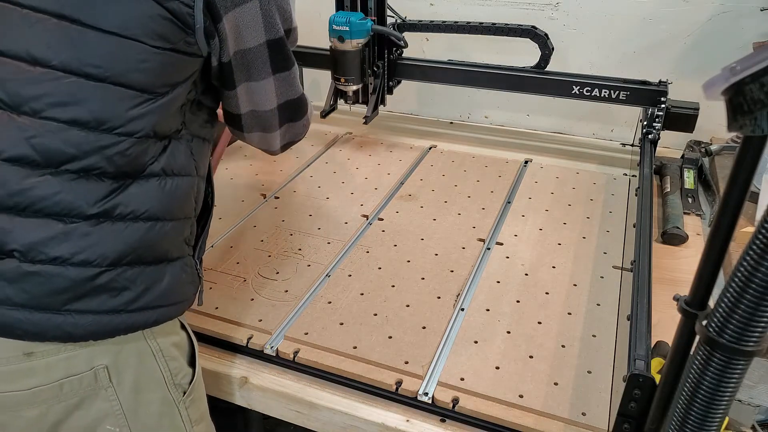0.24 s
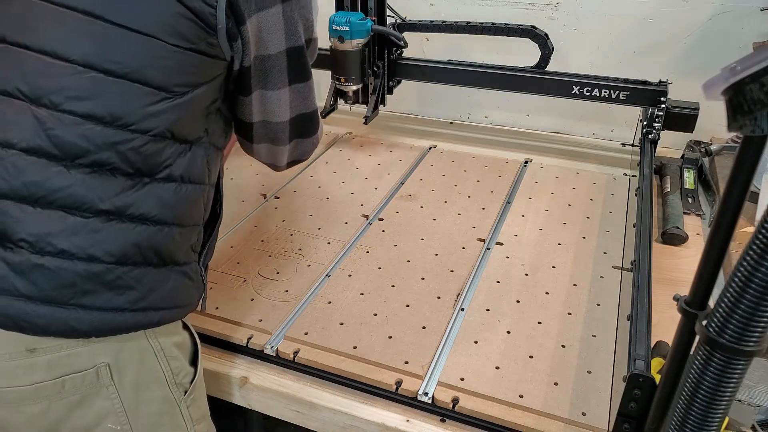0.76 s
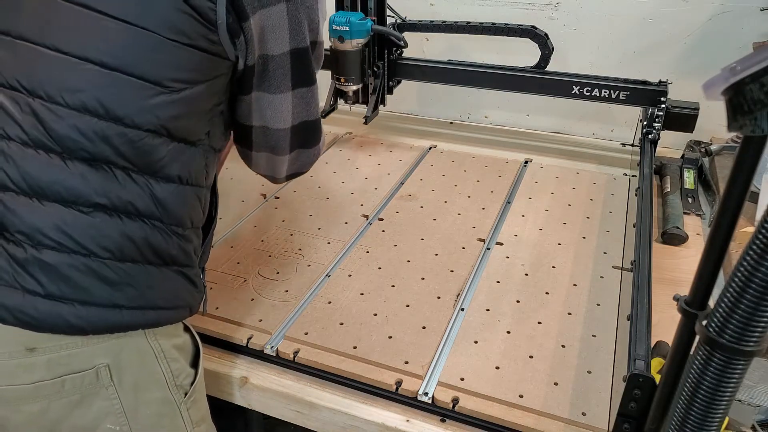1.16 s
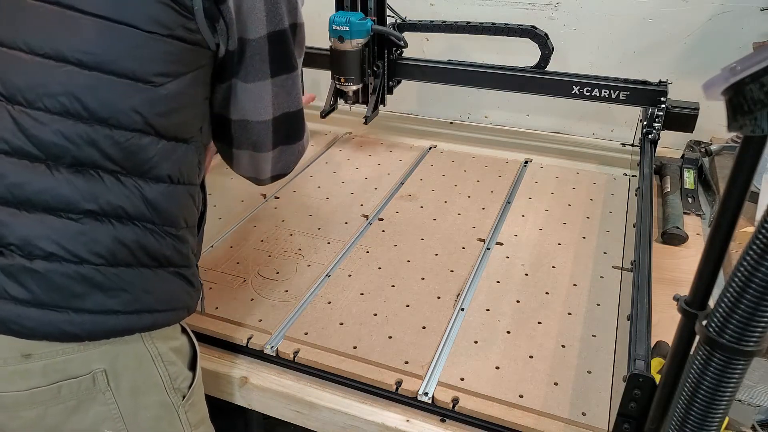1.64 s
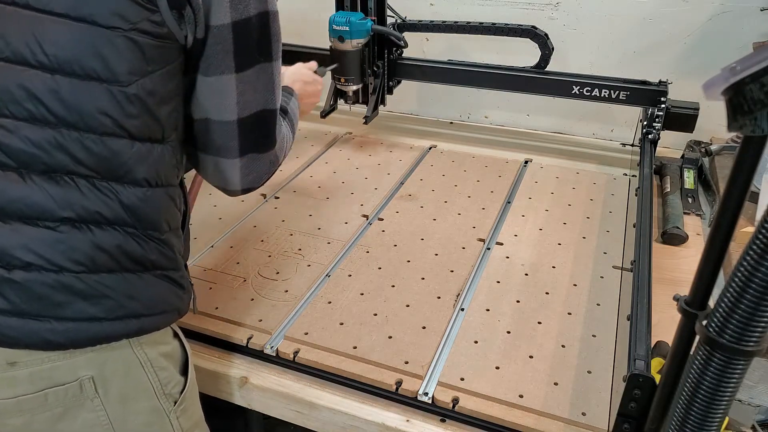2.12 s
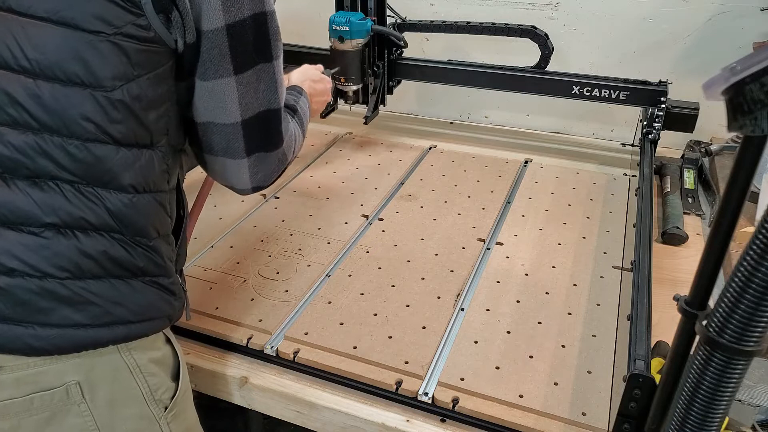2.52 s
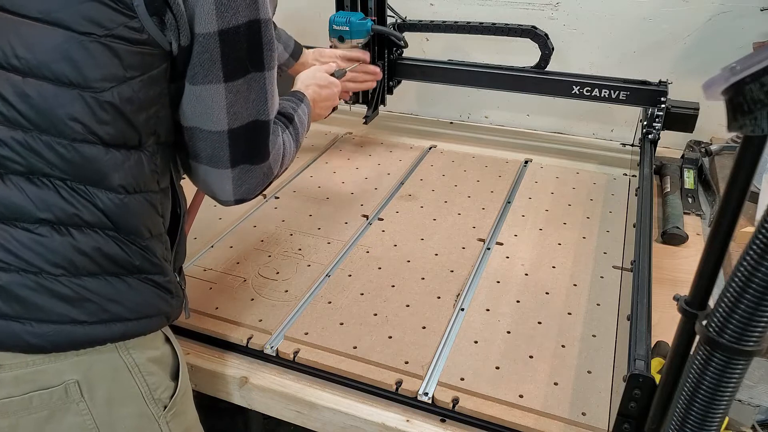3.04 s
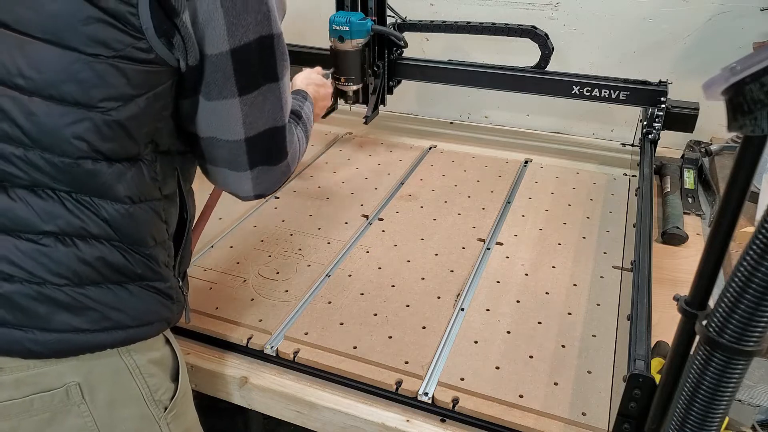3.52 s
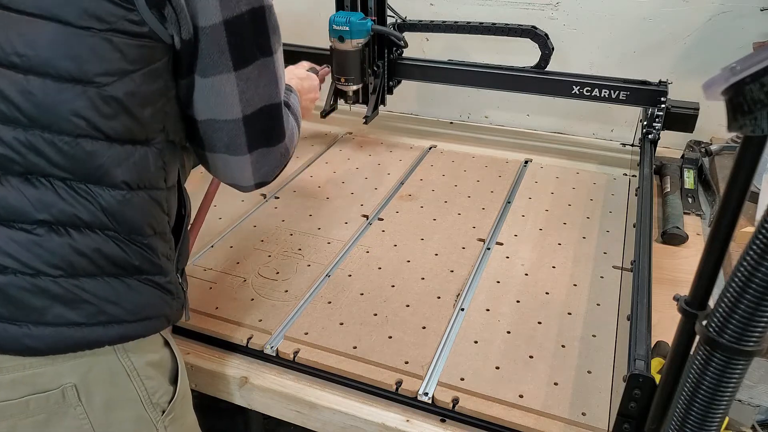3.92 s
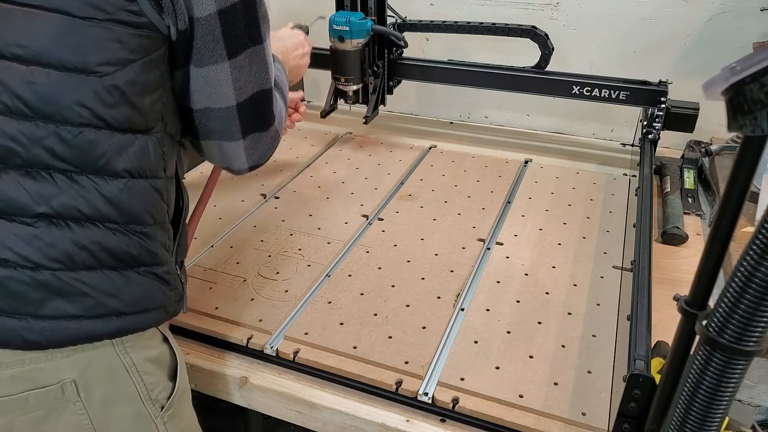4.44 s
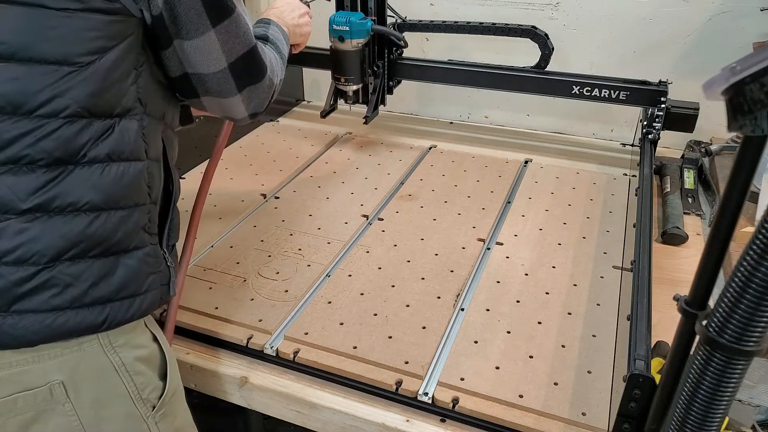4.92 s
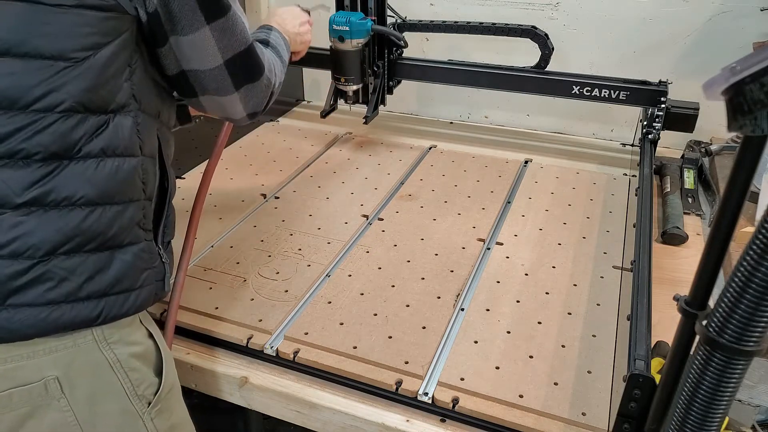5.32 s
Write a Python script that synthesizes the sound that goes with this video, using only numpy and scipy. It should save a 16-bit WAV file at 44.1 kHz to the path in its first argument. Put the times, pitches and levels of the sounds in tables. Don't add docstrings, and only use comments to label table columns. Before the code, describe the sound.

A compressed-air gun is already blowing at the start, a bright, loud hiss with hollow, pipe-like colour, wavering as it sweeps over a machine until about 1.0 s. Over it, at 0.25-0.37 s, a part knocks on the bed: a quick scrape, several sharp cracks on board, a small metallic ring and low bench thuds, somewhat left. Short bursts of about a tenth of a second follow at 1.25, 1.45, 1.65, 1.9, 2.25 and 2.45 s, several ending in a tiny valve spit, strongest near 2.4 s. From 2.7 to 3.4 s the air rests: nylon vest rustles, soft low bench thuds, a faint fitting tinkle near 3.3 s. More bursts come at 3.45, 3.65 and 4.15 s, then cloth rustle around 4.5 s. A longer blast runs 4.75-5.45 s, easing away into soft thuds and padding puffs. Small quiet workshop, close stereo camera microphone, short echoes.

```python
import sys
import numpy as np
from scipy import signal
from scipy.fft import rfft, irfft, next_fast_len
from scipy.io import wavfile
from scipy.ndimage import uniform_filter1d

SR = 44100
rng = np.random.default_rng(int(sys.argv[2]) if len(sys.argv) > 2 else 0)


def voltage_ratio(decibels):
    exponent = np.asarray(decibels, float) / 20
    return 10 ** exponent


def int16_out(signal):
    q = np.round(np.clip(np.atleast_2d(signal).T, -1, 1) * 32767)
    wavfile.write(sys.argv[1], SR, q.astype(np.int16))


N = 245637
T = np.arange(N) / SR


def scale_to(x, db):
    return x * voltage_ratio(db) / np.sqrt(np.mean(x ** 2))


def colour(points, hz):
    at, value = np.transpose(points)
    return np.interp(np.log(hz + 1), np.log(at + 1), value)


def shape(x, points):
    size = next_fast_len(x.shape[-1] + 4096)
    gain = voltage_ratio(colour(points, np.fft.rfftfreq(size, 1 / SR)))
    return irfft(rfft(x, size) * gain, size)[..., :x.shape[-1]]


def bump(hz, centre_hz, width_hz):
    return 1 / (1 + (2 * (hz - centre_hz) / width_hz) ** 2)


def walk(rate, size):
    hold = int(SR / rate)
    steps_held = np.repeat(rng.standard_normal(size // hold + 1), hold)
    return 1.3 * uniform_filter1d(uniform_filter1d(steps_held, hold), hold)[:size]


def ring(hz, t60):
    t = np.arange(int(1.2 * t60 * SR) + 8) / SR
    return np.sin(2 * np.pi * hz * t) * np.exp(-np.log(1000) * t / t60)


def add(out, s, sound):
    start = int(s * SR)
    sound, start = sound[..., max(-start, 0):], max(start, 0)
    out[..., start:start + sound.shape[-1]] += sound[..., :out.shape[-1] - start]


def heard(x, late, wet_db, t60, alike_hz, moving, room_late=12):
    hop, lead, t = 800, 30, np.arange(4400) / SR
    high = signal.butter(2, alike_hz, "high", fs=SR)
    low = signal.butter(2, alike_hz, fs=SR)
    keep = np.sqrt(1 - np.clip(moving, 0, 1) ** 2)
    decay = np.exp(-np.log(1000) * t / t60) * (t > .002)
    decay = decay * voltage_ratio(wet_db) / np.sqrt(np.sum(decay ** 2))
    out = np.zeros((2, len(x) + 3 * hop + len(t)))
    paths = rng.standard_normal((3, len(t)))
    padded = np.pad(x, (hop, 2 * hop))
    window = signal.windows.hann(2 * hop, sym=False)
    for start in range(0, len(x) + hop, hop):
        paths = keep * paths + np.sqrt(1 - keep ** 2) * rng.standard_normal(paths.shape)
        bass = signal.lfilter(*low, [np.roll(paths[0], room_late), paths[0]])
        room = (signal.lfilter(*high, paths[1:]) + bass) * decay
        room[[0, 1], [lead + late, lead]] += 1
        piece = signal.fftconvolve((padded[start:start + 2 * hop] * window)[None], room, axes=1)
        out[:, start:start + piece.shape[1]] += piece
    return out[:, hop + lead:] / np.sqrt(1 + voltage_ratio(2 * wet_db))


def hiss(table, centres, edges, gain_db, swell_db, flicker_db, rate):
    s, db, *over = np.transpose(table)[:len(centres) + 1]
    size = next_fast_len(int((s[-1] - s[0]) * SR))
    t, hz = s[0] + np.arange(size) / SR, np.fft.rfftfreq(size, 1 / SR)
    noise = rfft(rng.standard_normal(size)) * voltage_ratio(gain_db(hz))
    power = voltage_ratio(2 * gain_db(hz))
    norm = [10 * np.log10(power[(hz > lo) & (hz < hi)].sum() / len(hz)) for lo, hi in edges]
    track = np.array([np.interp(t, s, db + o) - n for o, n in zip([0] + over, norm)])
    cut = np.concatenate([np.geomspace(130, 2600, 11), np.arange(3200, 17000, 1130)])
    out, shared = 0, walk(rate, size)
    swell = walk(rate / 4, size)
    for lo, mid, hi in zip(cut, cut[1:], cut[2:]):
        weights = [np.interp(-np.log(mid), -np.log(centres), row) for row in np.eye(len(centres))]
        shared = .7 * shared + .7 * walk(rate, size)
        band = irfft(noise * np.interp(hz, [lo, mid, hi], [0, 1, 0]), size)
        out = out + band * voltage_ratio(weights @ track + swell_db * swell + flicker_db * shared)
    fade = np.clip(np.minimum(t - s[0] + (s[0] == 0), s[-1] - t) / .006, 0, 1)
    return out * fade * voltage_ratio(2.0)


def panned(pair, table):
    s, pan_db = np.transpose(table)[[0, -1]]
    pan_db = np.interp(s[0] + np.arange(pair.shape[1]) / SR, s, pan_db)
    return pair * voltage_ratio(np.array([pan_db, -pan_db]) / 2)


# (frequency [Hz], left minus right [dB])
PORT_DIFFERENCE = [(60, -2), (110, -3), (200, 0.5), (380, 6.5), (700, 6.5), (1290, 6), (2380, 9),
                   (4400, 12), (8120, 10.5), (15000, 5)]


def ports(pair):
    tilt = np.array(PORT_DIFFERENCE) - [0, 4.5]
    return np.array([shape(pair[0], tilt * [1, .5]), shape(pair[1], tilt * [1, -.5])])


def steps(start, end):
    return start + np.arange(0, np.ceil((end - start) * 4) / 4, .004)


# (share of the opening time [0-1], level under full flow [dB])
VALVE_OPENING = [(-.3, 89.5), (0, 47.5), (.12, 34.5), (.5, 14.5), (.85, 2.5), (1, 0)]


def flow(s, opens, lets_go, open_db, end_db, ease, open_s):
    full = np.interp(s, [opens + open_s, lets_go], [open_db, end_db])
    opening = np.interp((s - opens) / open_s, *np.transpose(VALVE_OPENING))
    after = np.maximum(s - lets_go, 0)
    shut = np.maximum(after - ease, 0)
    closing = 126 * np.minimum(after, ease) + 321.5 * shut + 501.5 * shut ** 2
    return full, opening, closing


# (time [s], distance gain [dB], extra metal roar [dB], extra hollow roar [dB])
BLAST_SWEEP = [(.0, 0.5, -3, 5.5), (.08, -1, 0.5, 0), (.25, 1, -5.5, 6.5), (.47, 3, -7.5, -3.5),
               (.75, 1.5, -7, -1.5), (.95, -0.5, -1.5, 2.5), (4.779, -1, -0.5, -6.5), (4.82, 0, 8, -2.5),
               (4.91, 0.5, 8.5, 0.5), (4.995, 1.5, 1, -9), (5.073, 1.2, 6, -0.5), (5.217, 0, 2.5, -8.5),
               (5.323, 2, -0.5, 6), (5.427, 4, 0.5, -13)]


def pull(row, aim):
    opens, lets_go, open_s = row[0], row[1], row[5]
    s = steps(opens, lets_go + .24)
    full, opening, closing = flow(s, *row)
    at, *sweep = np.transpose(BLAST_SWEEP)
    is_long = lets_go - opens > .5
    gain_db, metal_db, hollow_db = [np.interp(s, at, column) * is_long for column in sweep]
    surge = 2 * (np.exp(-np.maximum(s - opens - open_s, 0) / .06) - .5)
    # dB that body, metal and hollow roar gain per dB under full flow
    opening_dull, closing_dull = (0.39, 0.39, .05), (0.29, 0.31, 0.29)
    over = [base + extra - surge + a * opening + b * closing
            for base, extra, a, b in zip(aim, (0, metal_db, hollow_db), opening_dull, closing_dull)]
    lean_db = np.minimum(.08 * (opening + closing), 6) - .5
    return np.transpose([s, full + gain_db + surge / 2 - opening - closing, *over, lean_db])


def tire(jet, row, db_per_s):
    top = shape(jet, [(9000, -40), (11000, -6), (13500, 0)])
    s = row[0] + np.arange(len(jet)) / SR
    fade_db = db_per_s * ((row[0] + row[1]) / 2 + row[4] - s)
    return jet + top * (voltage_ratio(np.clip(fade_db, -9, 9)) - 1)


# (frequency [Hz], level per Hz [dB])
JET_COLOUR = [(88, -65.5), (150, -32.5), (446, -22), (1030, -21.5), (1460, -16.5), (2120, -17), (6290, -7),
              (7950, -7), (11100, -3), (15700, -4.5)]
TUBE_HZ = [624, 1560, 2607, 3744, 5056, 6264, 7900, 9080, 10280, 11420, 12450, 13520, 14600, 15620]
# (width [Hz], level over the jet [dB])
TUBE_MODES = [(330, 2.5), (370, 6.5), (870, 7), (540, 6.5), (670, 4.5), (720, 5), (300, 2), (300, 4),
              (350, 4.5), (300, 7), (350, 7), (350, 7), (350, 8.5), (280, 5.5)]


def nozzle_colour(hz, edge, bright_db):
    edge_hz, edge_db, *middle_db = edge
    tube = sum(db * bump(hz, f, width) for f, (width, db) in zip(TUBE_HZ, TUBE_MODES))
    tube = tube + edge_db * bump(hz, edge_hz, 500)
    tube = tube + sum(db * bump(hz, f, f / 4) for f, db in zip((2700, 5800, 7800), middle_db))
    return colour(JET_COLOUR, hz) + tube + bright_db * np.log2(np.maximum(hz / 8e3, 1))


# (opens [s], let go [s], jet once open [dB], jet at let-go [dB], slow easing-off [s])
PULLS = [(-.14, 0.965, -29.5, -32.5, 0.035), (1.256, 1.37, -29.5, -26, 0.0044),
         (1.46, 1.569, -26, -25.5, 0.0041), (1.666, 1.784, -20.5, -24.5, .005),
         (1.902, 2.046, -27, -27.5, 0.0082), (2.25, 2.366, -25.5, -24.5, 0.0034),
         (2.465, 2.573, -26.5, -24.5, 0.0039), (3.464, 3.544, -34.5, -24, .005),
         (3.637, 3.783, -26, -26, 0.086), (4.137, 4.245, -24, -23.5, 0.0038),
         (4.742, 5.418, -25.5, -31, 0.071)]
OPEN_S = [.036, 0.04, 0.036, 0.03, 0.035, 0.034, 0.03, 0.026, 0.033, 0.042, 0.035]
# (body [dB over jet], metal roar [dB over jet], hollow roar [dB over jet],
# brightness above 8 kHz [dB per octave])
AIMS = [(-10, -22, -28, 0), (-11, -26, -34.5, -1), (-9, -24, -29.5, 0.8), (-9, -28, -32.5, -4.5),
        (-11.5, -26.5, -32, -5), (-13, -28, -38, -3), (-11.5, -25, -36.5, -2), (-11.5, -21.5, -36.5, -4),
        (-10.5, -24, -36, -2.7), (-12.5, -21.5, -35.5, 0.5), (-9.5, -21.5, -30.5, -2.5)]
# (edge tone [Hz], its level [dB], near 2.7 kHz [dB], near 6 kHz [dB],
# near 8 kHz [dB])
EDGES = [(12450, -1, -0.1, -0.2, 2.5), (13500, 2.5, -4, 1.8, 1), (14700, 4, -1.7, 1.8, 3),
         (10800, 2.5, -0.3, 0.4, 1.5), (14600, 6.5, 0.3, 1.3, 0), (12400, 1, 3, -2.5, 0.3),
         (11450, 4.5, -1, 0.8, 3.5), (14600, 3, -1.5, 1, 3), (13600, 3, 0, 3, 1.5), (12400, 5.5, 1, -1, -1),
         (12240, 0.5, -1, 1.7, -0.3)]
LEFT_LATE = [24, 14, 12, 20, 10, 4, 4, 6, -4, -8, -5]
ECHO_LATE = [8, 10, 10, 10, 10, 10, 10, 10, 10, 10, -6]
TIRING = [3.5, .1, .1, -1, .1, 2, 2, .1, 34, .1, 7]
CONTROL_HZ = [11500, 4300, 1400, 500]


def gun():
    out = np.zeros((2, N))
    pulls = zip(PULLS, OPEN_S, AIMS, LEFT_LATE, EDGES, ECHO_LATE, TIRING)
    for row, open_s, (*aim, bright_db), late, edge, echo_late, tiring in pulls:
        table = pull((*row, open_s), aim)
        jet = hiss(table, CONTROL_HZ, [(8e3, 16e3), (2400, 7e3), (1e3, 2e3), (200, 900)],
                   lambda hz: nozzle_colour(hz, edge, bright_db),
                   swell_db=-0.27, flicker_db=0.33, rate=25)
        jet = tire(jet, row, tiring)
        pair = heard(jet, late, wet_db=9.0 - 0.3 * bright_db, t60=0.078, alike_hz=1970,
                     moving=0.87, room_late=echo_late)
        add(out, table[0][0], panned(pair, table))
    return ports(out)


# (frequency [Hz], level per Hz [dB])
HUSH_COLOUR = [(18, -38), (30, -6.5), (81, -5.5), (325, -24), (2380, -29), (4960, -25), (7350, -29),
               (15700, -32)]


def hush():
    return scale_to(shape(rng.standard_normal((2, N)), HUSH_COLOUR), -77.5)


# (time [s], peak [dB], frequency [Hz], t60 [s])
SLAMS = [
    (.252, -32, 68.3, 0.055),
    (.274, -25.5, 80, 0.068),
    (.306, -32.5, 90, .07),
    (.340, -29, 68, 0.025),
]
# (time [s], peak [dB], frequency [Hz], t60 [s])
THUDS = [(.385, -47, 62, .06), (0.409, -39, 62, 0.057), (0.431, -44, 52, 0.048), (0.476, -52, 62, 0.041),
         (0.498, -54, 72, .06), (0.544, -52, 53.8, 0.083), (0.597, -56, 87, 0.13), (0.679, -58, 55.7, 0.18),
         (0.797, -58, 72, 0.27), (2.836, -63, 85.3, .06), (2.861, -55, 77.5, 0.12),
         (2.894, -54, 68.3, 0.12), (2.919, -55, 72, 0.12), (2.961, -61, 56, 0.12), (3.014, -50, 67.6, 0.18),
         (3.048, -55, 78.6, 0.14), (3.086, -54, 78, 0.11), (3.113, -45, 75, 0.26),
         (3.204, -60.5, 65, 0.095), (3.239, -56, 73.5, 0.052), (3.265, -57.5, 76.4, 0.034),
         (3.328, -70, 72.7, 0.13), (4.29, -63, 63.7, 0.23), (5.045, -60, 78.1, 0.1),
         (5.083, -54, 64.6, 0.076), (5.134, -59, 61.9, 0.12), (5.425, -57, 100, 0.15),
         (5.461, -51, 121, 0.1), (5.494, -55, 99, 0.12), (5.513, -53, 88.5, 0.055),
         (5.545, -53, 59.2, 0.12)]


def thuds():
    out = np.zeros((2, N))
    for s, db, hz, t60 in [*SLAMS, *THUDS]:
        push = signal.windows.hann(int(1.6 * SR / hz))
        thud = np.convolve(ring(hz, t60), push * ring(hz, 0.9)[:len(push)])
        thud = voltage_ratio(db) * thud / np.abs(thud).max()
        late = .003 if s < 1 else .0003 if s < 4 else .0018
        s = s - .008 * (s < 1)
        add(out[1], s, thud * voltage_ratio(2.5))
        add(out[0], s + late, thud * voltage_ratio(4.0))
    return out


# (time [s], level [dB])
SHUFFLE = [(0.0, -79), (0.25, -73), (0.43, -53.5), (0.94, -78), (1.12, -75.5), (1.7, -75.5), (2.03, -66.5),
           (2.2, -82), (2.52, -68.5), (2.72, -83), (2.89, -77.5), (3.04, -64.5), (3.1, -59.5), (3.35, -75),
           (3.75, -71.5), (4.08, -84), (4.5, -71.5), (5.07, -81), (5.57, -59)]


def bench():
    rumble = voltage_ratio(np.interp(T, *np.transpose(SHUFFLE)))
    jet = 0
    for row, open_s in zip(PULLS, OPEN_S):
        full, opening, closing = flow(T, *row, open_s)
        jet = jet + voltage_ratio(full - opening - closing)
    low, upper = rng.standard_normal((2, 2, N))
    low = shape(low[0] + .5 * low,
                [(20, -36.5), (45, -1.0), (65, -1), (95, -1.5), (130, -21.0), (300, -62.5)])
    upper = shape(upper[0] + 1.2 * upper, [(60, -37.0), (130, -0.5), (220, -2.0), (320, -9), (700, -33)])
    out = thuds()
    felt = uniform_filter1d(np.abs(out[1]), int(0.033 * SR)) + 1e-9
    hard = (felt / felt.max()) ** .3
    shake = rumble * voltage_ratio(-6.5) + jet * voltage_ratio(-44) + felt * hard * voltage_ratio(-14)
    return out + scale_to(low, 0.14) * rumble + scale_to(upper, -3.5) * shake


# (frequency [Hz], level per Hz [dB])
SCRAPE_COLOUR = [(150, -10), (400, -15), (900, -5.5), (1600, 2.5), (2100, -5.5), (4000, -5), (8000, -26.5),
                 (14000, -24.5)]


def crash():
    s = T[:SR] - 0.2827
    hold_s, late = 0.083, 42
    db = np.interp(s, [-.1, -0.032, 0, hold_s], [-90, -25, 0, -10.5])
    db = db - 380 * np.maximum(s - hold_s, 0)
    noise = scale_to(shape(rng.standard_normal(SR), SCRAPE_COLOUR), -28.5) * voltage_ratio(db + 0.67 * walk(76, SR))
    snap = shape(rng.standard_normal(2000), [(1500, -22.5), (3000, -7.5), (6000, -10.0), (11000, -1.5)])
    snap = snap * np.minimum(T[:2000] / 0.0043, 1) * np.exp(-T[:2000] / 0.0059)
    add(noise, .284, voltage_ratio(-19.5) * snap)
    return heard(noise, late, wet_db=0.0, t60=0.1, alike_hz=2006, moving=0.99, room_late=late)


# (time [s], peak [dB])
CLATTER = [
    (0.261, -23.5),
    (0.273, -10.5),
    (0.285, -5.5),
    (0.293, -20.5),
    (0.304, -34.5),
    (0.317, -13.5),
    (0.329, -24),
    (0.344, -21),
    (0.364, -29.5),
]
# (frequency [Hz], level [dB], t60 before damping to 0.17 of it [s])
BOARD_MODES = [(250, -6.5, 0.27), (388, -8.5, 0.72), (703, -6, 0.35), (1111, -5, 0.29), (1168, -14.5, 0.17),
               (1610, -3, 0.27), (1840, 0.5, 0.13), (2660, -4, 0.3), (2800, -9.5, 0.35), (3180, -11, 0.32)]


def knock():
    out, t, late = np.zeros(SR), T[:12000], 58
    crack_colour = [(100, -15.0), (160, -8), (250, 1.5), (400, 1.0), (700, 2.0), (1500, -6), (3000, -2.5),
                    (6000, -11.5), (12000, -19.5)]
    for s, db in CLATTER:
        crack = rng.standard_normal(len(t)) * np.exp(-t / 0.013)
        board = voltage_ratio(2.0) * shape(crack, crack_colour)
        for (hz, mode_db, t60), push in zip(BOARD_MODES, rng.standard_normal(len(BOARD_MODES))):
            add(board, 0, voltage_ratio(mode_db - 2) * push * ring(hz, 0.17 * t60)[:len(t)])
        add(out, s, voltage_ratio(db - 5.5) * board / np.abs(board).max())
    return heard(out, late, wet_db=-2.5, t60=0.2, alike_hz=1496, moving=0.49, room_late=late)


# (frequency [Hz], level [dB], t60 [s])
PART_MODES = [(7935, -26.5, .3), (9561, -24, .15), (11550, -19, 0.073), (14640, -36.5, .08),
              (15460, -33.5, .08)]
# (frequency [Hz], level [dB], t60 [s])
REBOUND_MODES = [(13510, -26, .25), (11550, -27, 0.25), (14700, -34, .1)]


def metal_ring():
    pair = np.zeros((2, SR))
    for s, late, modes in ((.285, 34, PART_MODES), (.304, 0, REBOUND_MODES)):
        for hz, db, t60 in modes:
            add(pair[0], s + late / SR, voltage_ratio(db) * ring(hz, t60))
            add(pair[1], s, voltage_ratio(db) * ring(hz, t60))
    return pair


def stroke(peak, rise, fall, db, dull_db=0, over_db=(-3.5, -13.5, -27)):
    s = steps(peak - .25, peak + .24)
    swell = db - 6.5 * ((s - peak) / np.where(s < peak, rise, fall)) ** 2
    over = [o + dull_db * octaves + 0 * s for o, octaves in zip(over_db, (1.1, 1.9, 1.9))]
    return np.transpose([s, np.maximum(swell, -160), *over])


# (loudest time [s], rise [s], fall [s], level [dB], dullness [dB per octave])
STROKES = [(1.13, 0.069, 0.084, -68.5, 2.5), (2.808, 0.06, 0.13, -72.5, -1), (2.955, 0.069, 0.023, -68, 3),
           (2.7, .03, .025, -83, 11), (3.085, 0.025, 0.065, -63, .5), (3.04, 0.024, 0.035, -77, 5.5),
           (3.245, 0.097, .035, -70.5, -3.5), (2.22, .05, .04, -78, 2), (3.38, 0.079, .06, -83, -2.5),
           (4.4, 0.054, .08, -75, -1.5), (4.56, 0.17, 0.13, -64.5, -1.7)]
# (loudest time [s], rise [s], fall [s], level [dB])
SQUEEZES = [(1.129, 0.11, 0.064, -65), (2.82, 0.05, 0.1, -75.5), (3.11, 0.055, 0.073, -85),
            (4.47, 0.063, 0.08, -68.5), (4.548, 0.036, 0.055, -61.5), (4.66, 0.066, 0.075, -68),
            (1.89, 0.052, 0.063, -61), (5.47, 0.059, 0.094, -61.5)]
# (frequency [Hz], level per Hz [dB])
CLOTH_COLOUR = [(150, -16.5), (250, -21), (313, -23), (451, -13.5), (917, -16.5), (2070, -17), (2640, -14),
                (3100, -14.5), (3730, -17), (9020, -19.5), (10400, -13.5), (15700, -12)]


def vest():
    out = np.zeros((2, N))
    padding_db = (7, 15, 29)
    squeezes = [stroke(*row[:3], row[3] - padding_db[2], over_db=padding_db) for row in SQUEEZES]
    for table in [stroke(*row) for row in STROKES] + squeezes:
        cloth = hiss(table, [11000, 5200, 2900, 900], [(7500, 16e3), (3800, 7e3), (2400, 3500), (300, 2e3)],
                     lambda hz: colour(CLOTH_COLOUR, hz), swell_db=.1, flicker_db=.5, rate=45)
        add(out, table[0][0], heard(cloth, 12, wet_db=11.5, t60=0.059, alike_hz=498, moving=0.87))
    return ports(out) * voltage_ratio([[.6], [-3]])


# (time [s], peak [dB])
SPITS = [
    (1.3944, -28),
    (1.5894, -20.5),
    (2.0567, -16.5),
    (2.382, -11),
    (2.5998, -23),
]


def spits():
    out = np.zeros((2, N))
    for s, db in SPITS:
        spit = shape(rng.standard_normal((2, 900)), JET_COLOUR) * np.exp(-T[:900] / .0025)
        add(out, s, voltage_ratio(db + 1) * spit / np.abs(spit).max())
    return ports(out)


# (time [s], level [dB], frequency [Hz], t60 [s])
JINGLES = [
    (3.245, -79.5, 8930, 0.17),
    (3.295, -76.5, 9017, 0.22),
    (3.30, -76, 6040, .2),
]


def jingle():
    out = np.zeros((2, N))
    for s, db, hz, t60 in JINGLES:
        add(out, s, voltage_ratio(db) * ring(hz, t60))
    return ports(out) * voltage_ratio([[.6], [-3]])


def scene():
    out = gun() + hush() + bench() + vest() + spits() + jingle()
    lean = voltage_ratio(np.array([[.5], [-.5]]) * 4.5)
    for part in (crash(), knock(), metal_ring()):
        add(out, 0, part * lean)
    return out


def band_limit(x):
    return signal.sosfilt(signal.butter(12, 16200, fs=SR, output="sos"), x)


# (frequency [Hz], level [dB])
CAMERA_BODY = [(6300, 0.44), (6900, -0.5), (7300, -3), (7700, -5), (8300, -0.17)]


def record(dry):
    bass_cut = signal.butter(6, 40, "high", fs=SR, output="sos")
    top_cut = signal.ellip(12, .3, 75, 15750, fs=SR, output="sos")
    mix = signal.sosfilt(np.vstack([bass_cut, top_cut]), shape(dry, CAMERA_BODY))
    return band_limit(mix)


dry = scene()
out = record(dry)
int16_out(out)
```